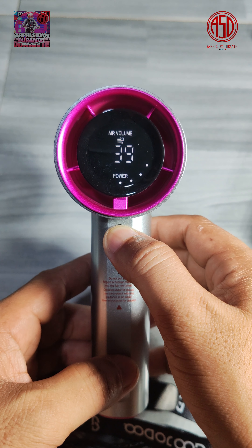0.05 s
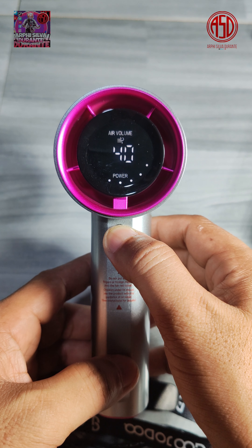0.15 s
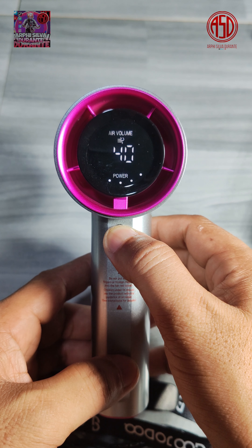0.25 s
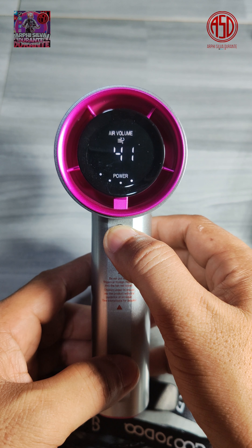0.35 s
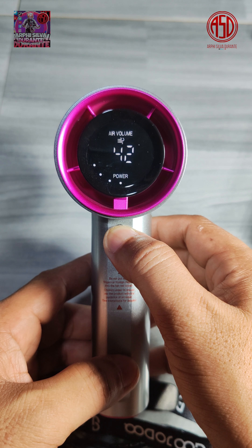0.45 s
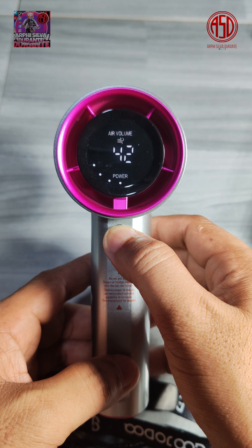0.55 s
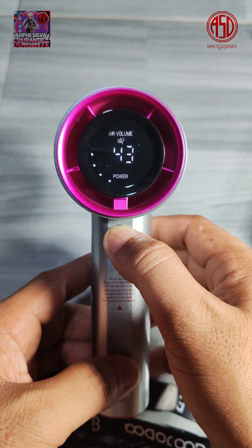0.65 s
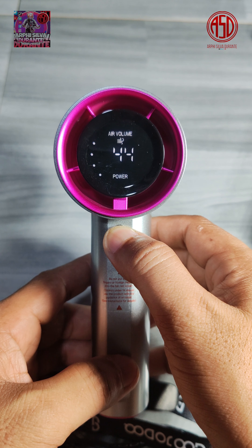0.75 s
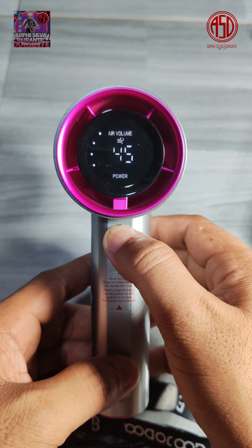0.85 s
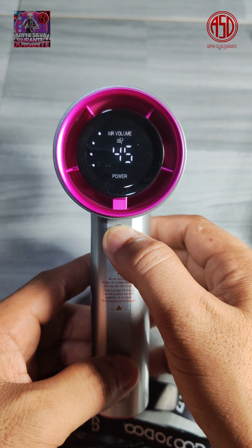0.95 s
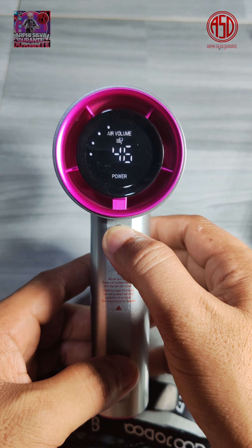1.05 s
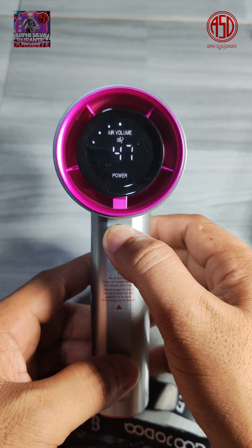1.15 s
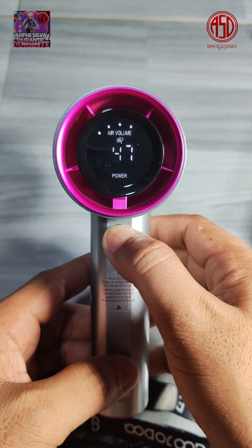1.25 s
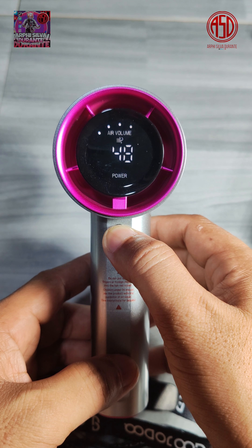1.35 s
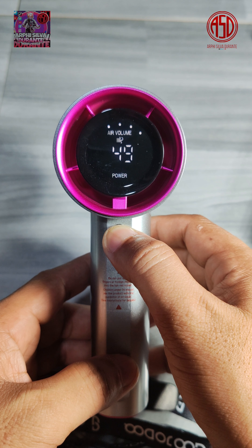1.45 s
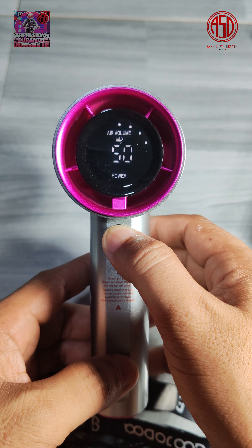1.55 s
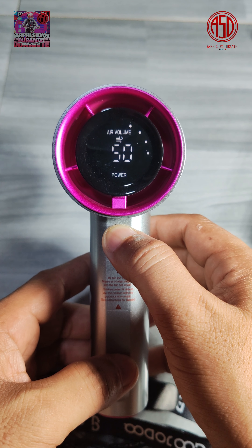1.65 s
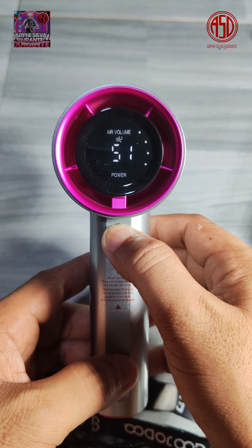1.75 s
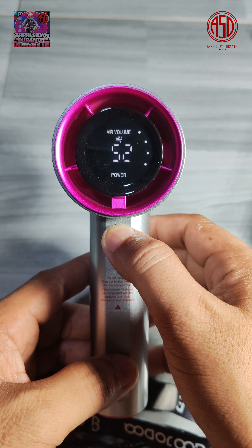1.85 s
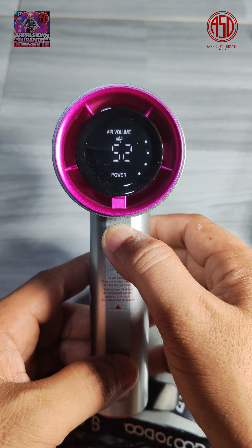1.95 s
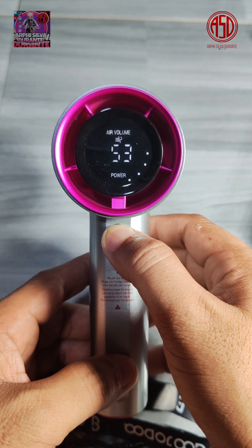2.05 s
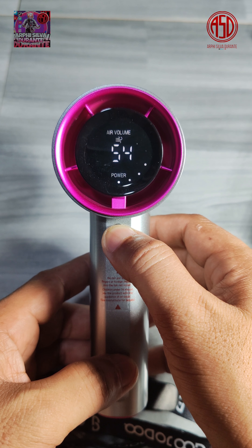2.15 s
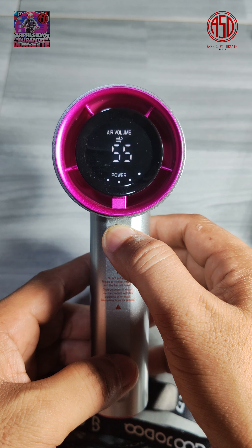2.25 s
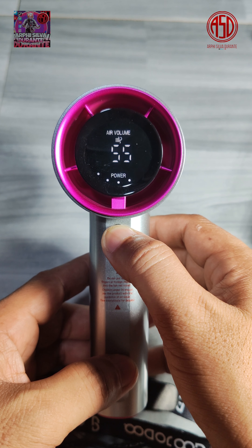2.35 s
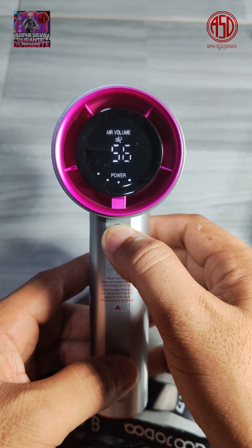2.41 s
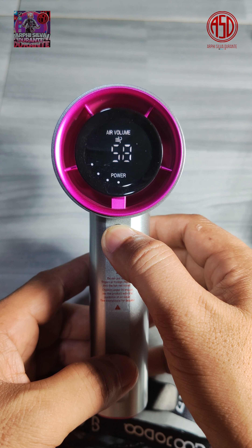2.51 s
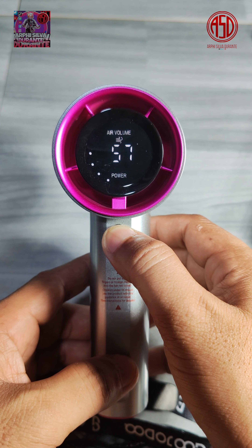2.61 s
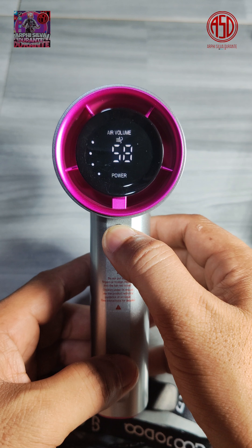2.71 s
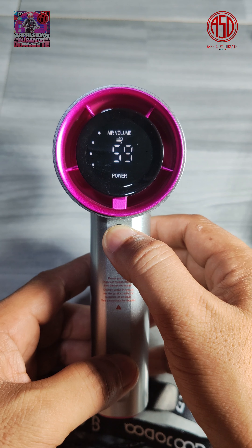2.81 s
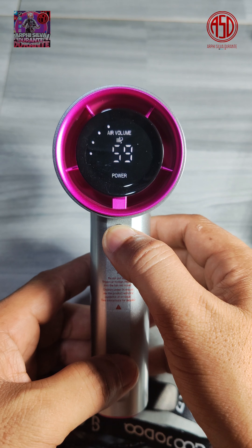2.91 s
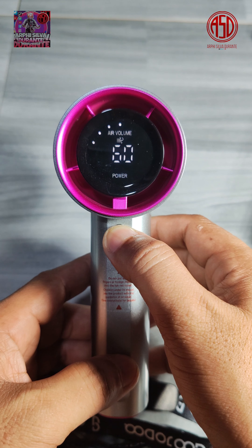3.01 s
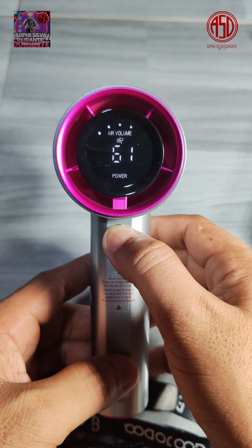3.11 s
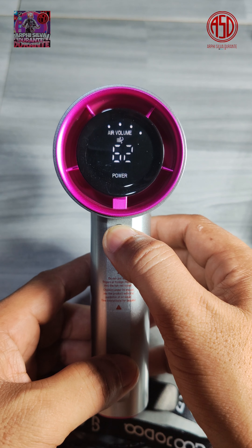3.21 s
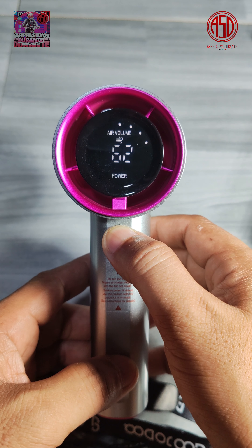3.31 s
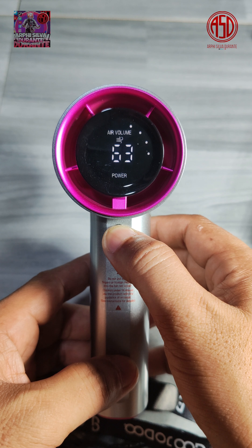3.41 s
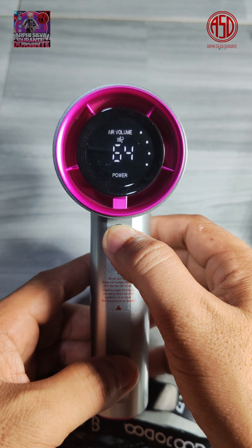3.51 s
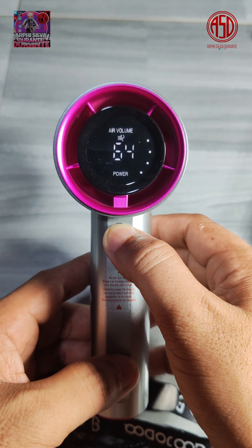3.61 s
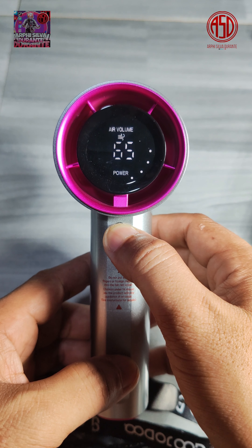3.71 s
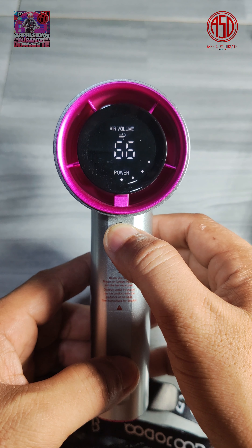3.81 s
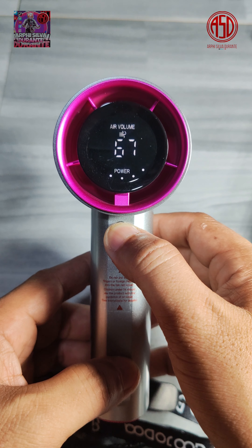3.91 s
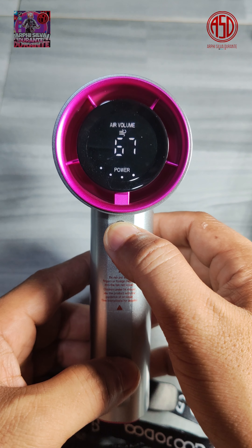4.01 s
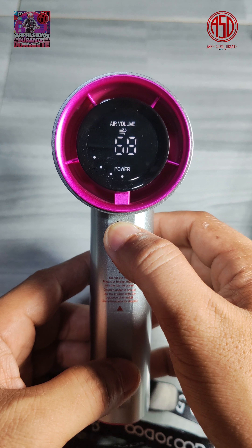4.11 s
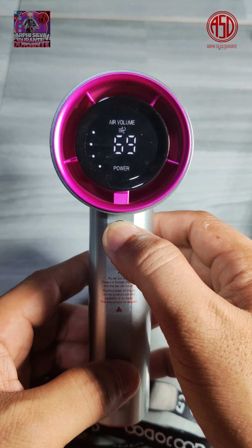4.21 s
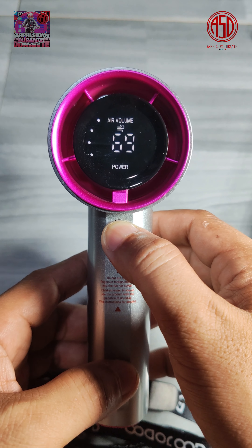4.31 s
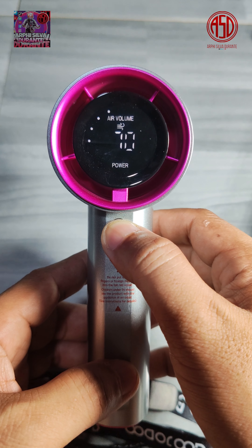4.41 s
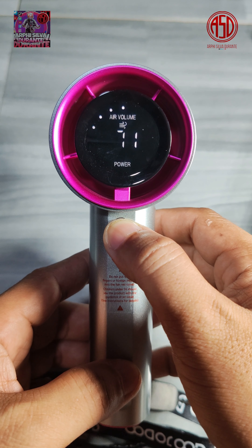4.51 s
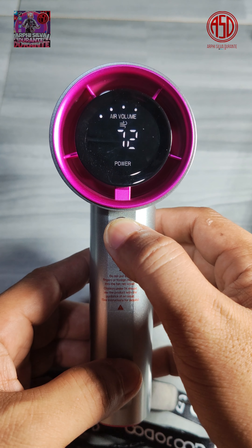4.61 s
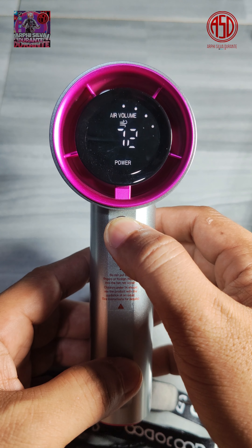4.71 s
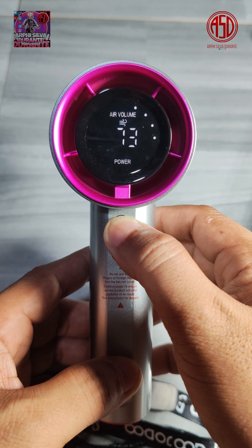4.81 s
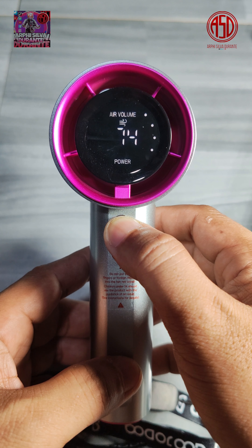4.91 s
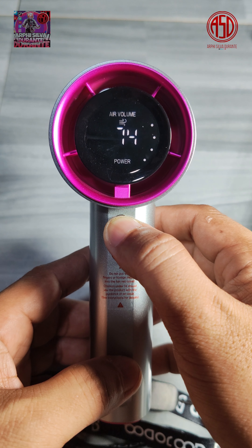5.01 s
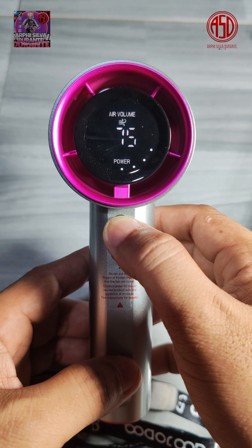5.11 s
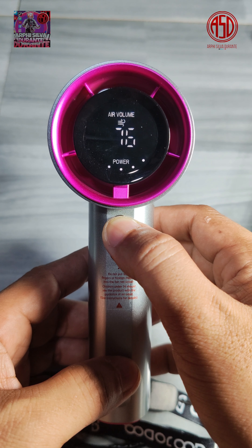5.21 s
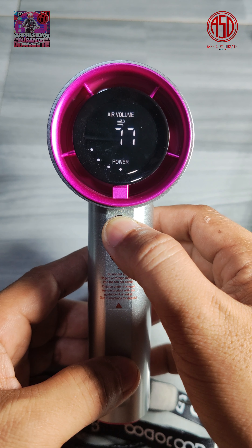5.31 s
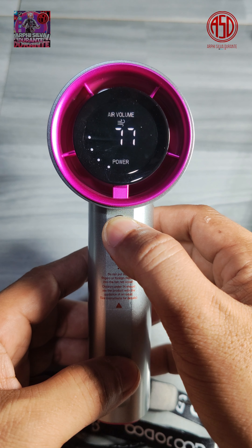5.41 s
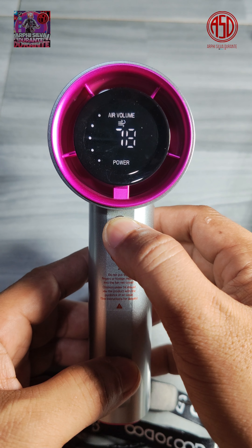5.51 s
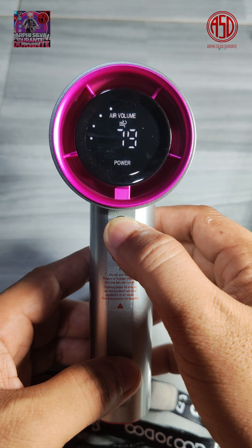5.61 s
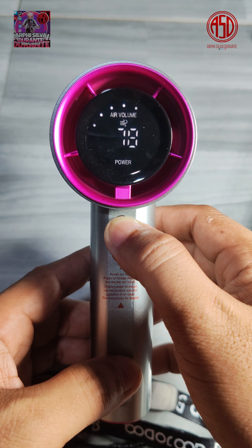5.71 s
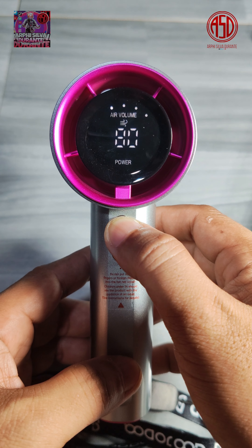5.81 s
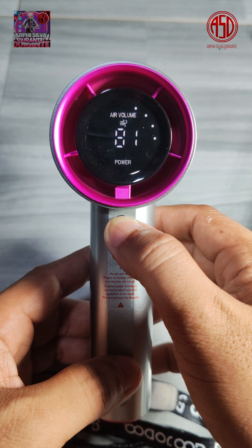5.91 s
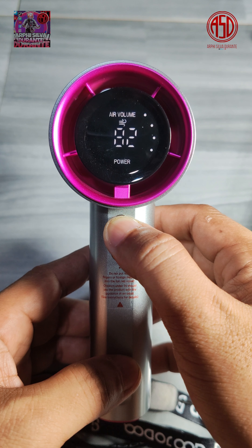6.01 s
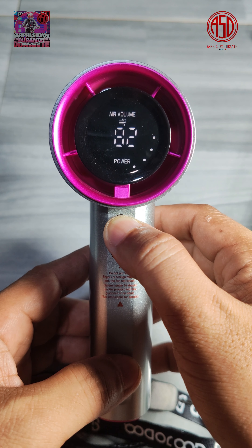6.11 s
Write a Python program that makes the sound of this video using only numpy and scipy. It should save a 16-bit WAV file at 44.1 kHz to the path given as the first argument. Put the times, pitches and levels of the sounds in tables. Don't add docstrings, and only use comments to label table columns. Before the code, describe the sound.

A small handheld turbo fan, already running, speeds up in nine or so small smooth lifts over six seconds. Its jet hits a close two-microphone phone indoors: heavy, ragged buffeting and dull snaps on the left, only scattered soft puffs on the right. Beneath are airy motor rush and a thin, very high whine gliding upward.

```python
import sys
import numpy as np
from scipy import signal
from scipy.fft import rfft, irfft, next_fast_len
from scipy.io import wavfile
from scipy.ndimage import uniform_filter1d

SR = 44100
rng = np.random.default_rng(int(sys.argv[2]) if len(sys.argv) > 2 else 0)


def invert_db(level):
    return 10 ** (np.asarray(level, dtype=float) / 20)


def unload_audio(sound):
    columns = np.transpose(np.atleast_2d(sound))
    steps = np.round(np.clip(columns, -1, 1) * 32767)
    wavfile.write(sys.argv[1], SR, steps.astype(np.int16))


N = 271215

# (time [s], speed gained [turns/s], ramp [s])
SPEED_STEPS = [
    (-0.3, 10.4, 0.42),
    (0.41, 12.6, 0.48),
    (1.09, 15.7, 0.47),
    (1.9, 15.4, 0.5),
    (2.66, 10.7, 0.43),
    (3.46, 10.5, 0.42),
    (4.14, 11.3, 0.47),
    (4.96, 11.1, 0.4),
    (5.7, 15.8, 0.4),
]
FIRST_TURNS_PER_S, SETTLE_S = 311, 0.12
LEVEL_OFF_TURNS_PER_S = 50

# (time [s], change [dB], half length [s])
GUSTS = [(0.022, 5, 0.0361), (0.13, 3.5, 0.01342), (0.192, 3, 0.0155), (0.284, 4, 0.02252),
         (0.354, -1.66, 0.0228), (0.474, -6, 0.035), (0.693, -5, 0.02282), (0.776, 5.5, 0.02172),
         (0.895, -3.0, 0.06), (0.98, 3.0, 0.0145), (1.107, -2.5, 0.05944), (1.3, 3.5, 0.0158),
         (1.384, 3, 0.015), (1.459, -2.5, 0.0356), (1.549, 2.5, 0.02177), (1.661, 3, 0.022),
         (1.734, -2.5, 0.0346), (1.803, 2, 0.0125), (1.918, -3.5, 0.0334), (2.063, 5, 0.035),
         (2.135, -4.5, 0.0159), (2.185, 6.0, 0.02157), (2.252, -2, 0.015), (2.327, 3.5, 0.0229),
         (2.449, 6.5, 0.035), (2.646, -2, 0.0364), (2.741, -4, 0.0357), (2.801, 3, 0.015),
         (3.006, -5, 0.02187), (3.14, 3, 0.03506), (3.21, -3.5, 0.02287), (3.367, -6.5, 0.03472),
         (3.447, 3, 0.0343), (3.547, 5.0, 0.03494), (3.612, -2.5, 0.0147), (3.649, -6.5, 0.035),
         (3.697, -2.5, 0.0217), (3.934, 5, 0.06), (4.006, 2.5, 0.0214), (4.086, -2.5, 0.03407),
         (4.171, 3, 0.0338), (4.335, -3, 0.02173), (4.425, 4.5, 0.02175), (4.575, -1.5, 0.0565),
         (4.714, -3.5, 0.01457), (4.767, 5, 0.02114), (4.869, -2.5, 0.0368), (4.936, 2.5, 0.02194),
         (5.141, -3.5, 0.0346), (5.295, 3.5, 0.01443), (5.338, -3.0, 0.0144), (5.475, -3, 0.0156),
         (5.572, 2.5, 0.02228), (5.617, -2, 0.01576), (5.682, -2.5, 0.0347), (5.837, 3, 0.01443),
         (5.909, 4.5, 0.06), (5.964, 2.5, 0.01555), (6.049, -4.5, 0.01508), (6.121, -4.0, 0.0221)]
# (time [s], change [dB], half length [s])
LUMPS = [(0.06, -0.5, 0.011), (0.244, 3.5, 0.058), (0.459, -3.5, 0.015), (0.494, 3.5, 0.017),
         (0.569, -2.5, 0.022), (0.654, -0.5, 0.015), (0.743, 4, 0.025), (0.828, -1.4, 0.018),
         (0.893, -3.5, 0.018), (0.945, 6.5, 0.013), (0.985, -4.5, 0.022), (1.025, 4.5, 0.011),
         (1.068, -3.5, 0.02), (1.175, -3.5, 0.022), (1.32, 1, 0.011), (1.417, -4, 0.017),
         (1.472, 2.1, 0.03), (1.609, -4, 0.019), (1.689, -2, 0.16), (1.714, 3.5, 0.013),
         (1.848, -1.8, 0.16), (1.936, 6, 0.019), (2.135, 3.5, 0.01), (2.19, -4, 0.02), (2.277, 2.5, 0.035),
         (2.392, 1, 0.016), (2.462, -5, 0.025), (2.562, -6, 0.032), (2.619, 2.8, 0.022),
         (2.684, -4.5, 0.026), (2.756, 2.5, 0.035), (2.821, -1.5, 0.027), (3.003, 0.5, 0.12),
         (3.275, -4, 0.03), (3.482, 5.5, 0.0099), (3.515, -3.5, 0.023), (3.539, -5.5, 0.073),
         (3.547, 5.2, 0.015), (3.589, -5, 0.012), (3.629, 4.5, 0.025), (3.746, 0.7, 0.02),
         (3.781, -7, 0.013), (3.841, 1.5, 0.042), (3.963, 0.5, 0.014), (4.113, 1.5, 0.042),
         (4.163, -6.5, 0.022), (4.22, 5, 0.022), (4.455, 5, 0.028), (4.575, 1.6, 0.082),
         (4.732, 2.3, 0.013), (4.824, -2, 0.045), (4.936, 3, 0.0083), (5.143, 3, 0.047),
         (5.298, -5, 0.0077), (5.637, 3.5, 0.021), (5.749, -2.3, 0.019), (5.907, -1.5, 0.22),
         (6.019, -4.5, 0.021), (6.059, 2, 0.028), (6.139, 1.5, 0.015)]
# (time [s], strength [dB])
SURGES = [(0.2881, -41.5), (0.5501, -32.5), (0.772, -24), (1.3803, -28), (1.476, -35.5), (1.5431, -28.5),
          (1.557, -29), (1.649, -33), (1.7977, -30.5), (1.9698, -25), (2.215, -28), (2.4348, -22),
          (2.737, -27.5), (2.942, -31), (3.05, -32), (3.2354, -27.5), (3.2995, -31), (3.596, -32.5),
          (3.956, -32), (4.4314, -28), (4.7524, -28), (4.924, -29), (5.4393, -23), (5.6617, -22),
          (5.912, -16.5)]
# (time [s], peak level [dB], bright part [dB])
SNAPS = [(0.021, -19.5, -34), (0.092, -20, -25), (0.261, -32, -27.5), (0.287, -40, -25), (0.335, -36, -23),
         (0.727, -38, -24), (0.771, -17, -26), (1.157, -24, -22), (1.295, -26, -35), (1.377, -30.5, -7.5),
         (1.476, -18.5, -29), (1.545, -36, -16), (1.799, -25, -22), (1.919, -26, -24), (1.969, -22.5, -26),
         (2.044, -35, -21), (2.06, -33, -28), (2.158, -38, -19), (2.271, -21.5, -27), (2.298, -32, -28),
         (2.395, -27, -15), (2.432, -22, -16), (2.481, -27, -27), (2.606, -22, -24), (2.801, -22, -23),
         (2.942, -28, -22), (3.049, -20, -24), (3.095, -18, -30), (3.157, -25, -27), (3.236, -20, -29),
         (3.411, -21.5, -27), (3.477, -32, -26), (3.518, -27, -31), (3.558, -27, -25), (3.602, -29, -24),
         (3.628, -19, -20), (3.834, -18, -26), (3.877, -19, -23), (3.889, -19, -28), (3.926, -31, -25),
         (3.949, -34, -21), (4.159, -30, -26), (4.261, -16, -28), (4.278, -15, -23), (4.373, -22, -25),
         (4.437, -19, -15), (4.753, -30, -15), (4.874, -17.5, -28), (4.924, -30, -6), (5.024, -22, -14),
         (5.231, -32, -21), (5.408, -18, -17), (5.439, -27, -12), (5.476, -21, -12.5), (5.532, -16.5, -17),
         (5.661, -18, -21), (5.682, -10.5, -29), (5.731, -20, -22), (5.881, -18.5, -17), (6.079, -21, -21)]
# (time [s], rms level [dB], half length [s])
PUFFS = [(0.027, -48, 0.042), (0.144, -40.5, 0.031), (0.206, -45, 0.02), (0.793, -54, 0.06),
         (0.91, -40, 0.042), (1.063, -47, 0.02), (1.132, -45, 0.028), (1.315, -48, 0.06),
         (1.434, -57, 0.015), (1.509, -45, 0.06), (1.546, -53.6, 0.02), (1.624, -36, 0.066),
         (1.716, -46, 0.02), (1.798, -36, 0.076), (1.806, -53.2, 0.02), (1.893, -53.2, 0.02),
         (1.968, -46, 0.06), (2.257, -53.6, 0.02), (2.26, -28, 0.06), (2.39, -49.4, 0.06),
         (2.514, -52, 0.06), (2.691, -44.0, 0.06), (2.801, -52, 0.035), (2.908, -51, 0.02),
         (2.913, -36, 0.055), (3.074, -50, 0.035), (3.395, -46, 0.02), (3.41, -36, 0.067),
         (3.517, -55.4, 0.02), (3.552, -43, 0.088), (3.859, -55, 0.035), (3.978, -50, 0.035),
         (4.073, -24, 0.028), (4.176, -50.8, 0.02), (4.29, -51, 0.02), (4.297, -36, 0.052),
         (4.547, -52.4, 0.06), (4.647, -51, 0.02), (4.687, -41.6, 0.054), (4.762, -39, 0.02),
         (4.841, -35, 0.06), (4.868, -51.7, 0.02), (5.026, -44, 0.039), (5.146, -45, 0.06),
         (5.208, -48.4, 0.02), (5.3, -37, 0.03), (5.398, -38.2, 0.035), (5.5, -29, 0.014),
         (5.562, -45, 0.023), (5.637, -35, 0.079), (5.732, -44, 0.035), (5.86, -43, 0.045),
         (6.106, -53, 0.06)]
PUFF_FLOOR_DB = -60
BUFFET_DB, BUFFET_SHORT_DB, JET_SHORT_DB = -17, 1.5, 11
RUSH_DB, RUSH_SHORT_DB = -40.5, 9
BRIGHT_HZ = 600
EVEN_S, EVEN_SHARE = 0.03, 0.8

# (centre [Hz], width [Hz], level [dB])
LEFT_PATH = [(990, 2000, -80.5), (2120, 2160, -77), (3630, 420, -75.5), (3980, 330, -75), (4650, 380, -78),
             (5550, 650, -77), (6350, 700, -79.5), (7120, 750, -76), (8200, 900, -86), (9050, 700, -87),
             (11700, 4300, -100), (13350, 700, -95), (14300, 900, -100), (15400, 1000, -100)]
# (centre [Hz], width [Hz], level [dB])
RIGHT_PATH = [(290, 230, -74), (900, 170, -77), (1100, 280, -70), (1330, 110, -76), (1600, 400, -83),
              (1900, 330, -72), (2700, 700, -83), (3550, 600, -78), (4000, 380, -75), (4700, 600, -86),
              (5550, 700, -82), (6350, 600, -75), (7000, 800, -78), (7600, 500, -84), (8350, 600, -80),
              (9300, 1300, -91), (10600, 1600, -99), (13550, 800, -101), (14500, 800, -108),
              (15600, 1000, -108)]
LEFT_LEAD_S, SHARED = 0.000816, 0.36
STEADY_BELOW_HZ, STEADY_ABOVE_HZ, STEADY_DB = 1000, 12000, -2
TOP_DROP_S, BACK_S, BACK_RAMP_S, TOP_DROP_DB, BACK_DB = 2.22, 4.3, 0.6, -45, -6

# (multiple of turn rate [1], left level [dB], right level [dB])
FAINT_TONES = [
    (6, 17, 14),
    (6.5, 14, 23),
    (15, 16, 16),
    (18, 13, 12),
    (40, 16, 14),
    (42, 8, 10),
    (44, 12, 12),
    (46, 16, 14),
    (48, 37, 39),
]
# (multiple [1], multiple that sets its level [1], left level [dB], right level [dB], steepness [1])
STRONG_TONES = [
    (3, 3, -14, -1.5, 1),
    (9, 9, -13, -12, 1),
    (11.5, 11.5, -17, -16, 1),
    (12, 12, -5, -10, 1),
    (12.5, 12.5, -17, -18, 1),
    (36, 36, -4, -18, 1),
    (34, 36, 108, 97, 4),
    (35, 36, 107, 97, 4),
    (37, 36, 195, 185, 6),
    (38, 36, 197, 185, 6),
]
# (centre [Hz], width [Hz], level [dB])
HOUSING = [(1090, 600, -39), (3430, 350, -48), (3630, 170, -39), (3870, 100, -53), (3950, 80, -42),
           (4100, 90, -39.5), (4200, 100, -44), (4550, 600, -55), (11850, 900, -67), (13160, 260, -44),
           (13500, 300, -51), (14000, 400, -70), (14350, 400, -71)]

# (time [s], depth [dB], recovery [s])
DUCKS = [
    (2.763, -3.2, 0.06),
    (4.207, -2.1, 0.059),
    (4.397, -3.2, 0.089),
    (5.11, -2.5, 0.062),
    (5.371, -3.0, 0.075),
    (5.858, -3.6, 0.096),
]
RUN_IN = 4410


def rms_one(x):
    return x / np.sqrt(np.mean(x ** 2) + 1e-20)


def drift(rate_hz):
    r = np.exp(-2 * np.pi * rate_hz / SR)
    slow = signal.lfilter([1], [1, -2 * r, r * r], rng.standard_normal(N + SR))
    return rms_one(slow[SR:])


def bumps(rows):
    t = np.arange(0, N, 64) / SR
    swells = sum(height * np.exp(-((t - s) / half) ** 2) for s, height, half in rows)
    return np.interp(np.arange(N) / SR, t, swells)


def evened(x):
    power = x ** 2 + 1e-12
    short = uniform_filter1d(power, size=int(EVEN_S * SR))
    short = uniform_filter1d(short, size=int(EVEN_S * SR / 2))
    return x * (uniform_filter1d(power, size=SR) / short) ** (EVEN_SHARE / 2)


def spin():
    t = np.arange(N) / SR
    ramps = sum(gain * np.clip((t - s) / ramp, 0, 1) for s, gain, ramp in SPEED_STEPS)
    return FIRST_TURNS_PER_S + uniform_filter1d(ramps, size=int(SETTLE_S * SR), mode="nearest")


def shortfall():
    turns = spin()
    return np.exp(-(turns - turns.min()) / LEVEL_OFF_TURNS_PER_S)


def eddies(speed_db, size_hz, lumps_db):
    speed = invert_db(speed_db)
    hz = np.arange(N + 1) * SR / (2 * N)
    small_are_rare = np.exp(-hz / size_hz)
    pattern = irfft(rfft(rng.standard_normal(2 * N)) * small_are_rare)
    swept = np.interp(np.cumsum(speed) % (2 * N - 1), np.arange(2 * N), pattern)
    dulled = signal.sosfilt(signal.butter(4, 9500, fs=SR, output="sos"), swept)
    return rms_one(dulled * speed ** 1.04 * invert_db(lumps_db * drift(30)))


def surges(jet_db):
    out, t = np.zeros(N + 882), np.arange(-441, 441) / SR
    for s, strength_db in SURGES:
        at = round(s * SR)
        lift_db = 0.5 * max(strength_db - jet_db[at] + 4, 0)
        out[at:at + 882] += lift_db * np.exp(-((t - 0.001) / 0.0035) ** 2)
    return out[441:N + 441]


def snaps():
    s, peak_db, bright_db = np.array(SNAPS).T
    chance = rng.random((len(SNAPS), 3))
    first = (s * SR).astype(int)
    second = first + ((0.0012 + 0.003 * chance[:, 1]) * SR).astype(int)
    out = 0
    for edges, db in ([550, 1500], peak_db + 0.34), ([1700, 2700], peak_db + bright_db + 12.6):
        kicks = np.zeros(N + SR)
        kicks[first] = invert_db(db) * np.sign(chance[:, 0] - 0.5)
        kicks[second] += invert_db(db) * (3.3 * chance[:, 2] - 0.8)
        band = signal.butter(3, edges, "band", fs=SR, output="sos")
        ring_peak = np.abs(signal.sosfilt(band, np.eye(1, 999)[0])).max()
        out = out + signal.sosfilt(band, kicks + 1e-18) / ring_peak
    return out[:N]


def wind():
    short, gust_db = shortfall(), bumps(GUSTS)
    jet_db = -26 - JET_SHORT_DB * short + gust_db
    flicker = 0.0835 * drift(41.4) + 0.5 * drift(131.3)
    flicker = flicker - uniform_filter1d(flicker, size=SR // 16)
    chance_db = (3.2 + 1.1 * short) * np.tanh(flicker)
    surge_db = surges(uniform_filter1d(jet_db, size=SR // 2))
    speed_db = 0.36 * (jet_db - jet_db.mean()) + chance_db + surge_db

    buffet = eddies(speed_db, size_hz=321.6, lumps_db=1.25)
    hz = np.arange(N // 2 + 1) * SR / N
    bright = irfft(rfft(buffet) / (1 + (BRIGHT_HZ / (hz + 1)) ** 8), N)
    buffet = evened(buffet - bright) + evened(bright) * invert_db(0.51 * gust_db + 0.6)
    buffet_db = BUFFET_DB - BUFFET_SHORT_DB * short + 6 + 0.84 * bumps(LUMPS)
    left = invert_db(buffet_db) * buffet + snaps()

    puffs = invert_db(PUFF_FLOOR_DB) + bumps([(s, invert_db(db), half) for s, db, half in PUFFS])
    right = invert_db(3.0) * puffs * evened(eddies(2.0 * drift(8), size_hz=60, lumps_db=0.5))
    return np.array([left, right])


def path_gain(path, hz):
    return np.sqrt(sum((invert_db(db) / (1 + (2 * (hz - centre) / width) ** 2)) ** 2
                       for centre, width, db in path))


def top_gain():
    t = np.arange(N) / SR
    top_db = np.interp(t, [TOP_DROP_S, TOP_DROP_S + 0.04, BACK_S, BACK_S + BACK_RAMP_S],
                       [0, TOP_DROP_DB, TOP_DROP_DB, BACK_DB])
    patches = 1 + np.clip(t - 3.8, 0, 1.2) * drift(14)
    return invert_db(top_db * np.clip(patches, 0.1, 4))


def rush(rush_gain):
    hz = np.arange(N // 2 + 1) * SR / N
    common, own_left, own_right = rfft(rng.standard_normal((3, N)))
    lead = np.exp(2j * np.pi * hz * LEFT_LEAD_S)
    left = path_gain(LEFT_PATH, hz) * (np.sqrt(SHARED) * common * lead + np.sqrt(1 - SHARED) * own_left)
    right = path_gain(RIGHT_PATH, hz) * (np.sqrt(SHARED) * common + np.sqrt(1 - SHARED) * own_right)
    right = right * (0.25 + 0.75 / (1 + (800 / (hz + 1)) ** 8))
    both = np.array([left, right])
    top = irfft(both * (hz > 13850), N)
    steady = irfft(both * ((hz < STEADY_BELOW_HZ) | (hz > STEADY_ABOVE_HZ)), N)
    growing = rush_gain * (irfft(both, N) - steady)
    air = growing + invert_db(STEADY_DB) * (steady - (1 - top_gain()) * top)
    return np.sqrt(SR / 2) * air * invert_db(0.5 * drift(31))


def rotor(rush_gain):
    speed = spin()
    coarse_speed = speed[::64]
    turns = np.cumsum(speed) / SR + 0.0005 * drift(250)
    flutter = invert_db(2.1 * np.array([drift(11), drift(11), drift(12)]))
    gains = []
    for multiple, left_db, right_db in FAINT_TONES:
        left = invert_db(left_db) * path_gain(LEFT_PATH, multiple * coarse_speed)
        right = invert_db(right_db) * path_gain(RIGHT_PATH, multiple * coarse_speed)
        gains.append(rush_gain * np.array([left, right]))
    for _, leader, left_db, right_db, steepness in STRONG_TONES:
        glide = path_gain(HOUSING, leader * coarse_speed) ** steepness
        gains.append(glide * invert_db([[left_db], [right_db]]))

    out, top_level = np.zeros((2, N)), top_gain()
    for k, (row, gain) in enumerate(zip(FAINT_TONES + STRONG_TONES, gains)):
        multiple = row[0]
        sine = np.sqrt(2) * np.sin(2 * np.pi * (multiple * turns + rng.random((2, 1))))
        smooth = uniform_filter1d(np.repeat(gain, 64, axis=1)[:, :N], size=64, axis=1)
        out += smooth * sine * flutter[k % 3] * (top_level if 38 < multiple < 48 else 1)
    return out


def scene():
    rush_gain = invert_db(RUSH_DB - RUSH_SHORT_DB * shortfall() + 43.5)
    return wind() + rush(rush_gain) + rotor(rush_gain[::64])


def ducking():
    t = np.arange(N) / SR
    return invert_db(sum(np.interp(t, [s, s + 0.02, s + 1.4 * back], [0, 1.3 * db, 0]) for s, db, back in DUCKS))


def roll_off(x):
    return signal.sosfilt(signal.butter(12, 15780, fs=SR, output="sos"), x)


def record(dry):
    x = np.concatenate([dry[:, RUN_IN:0:-1], dry], axis=1)
    x = signal.sosfilt(signal.butter(6, 88, "high", fs=SR, output="sos"), x)
    x = x + 0.13 * signal.lfilter(*signal.iirpeak(140, 2.5, fs=SR), x)
    x = x + 0.46 * signal.lfilter(*signal.iirpeak(310, 1.4, fs=SR), x)
    x = np.clip(1.5 * np.tanh(ducking() * x[:, RUN_IN:] / 1.5), -1, 1)
    size = next_fast_len(N)
    hz = np.arange(size // 2 + 1) * SR / size
    top = irfft(rfft(x, size) * (hz > 14450), size)[:, :N]
    mix = x - (1 - top_gain()) * top
    return roll_off(mix)


dry = scene()
out = record(dry)
unload_audio(out)
```